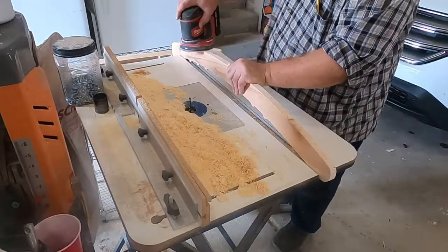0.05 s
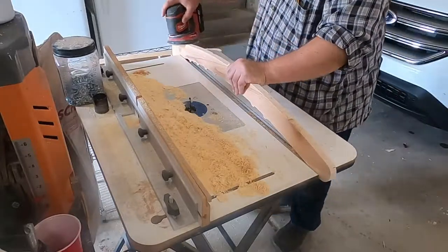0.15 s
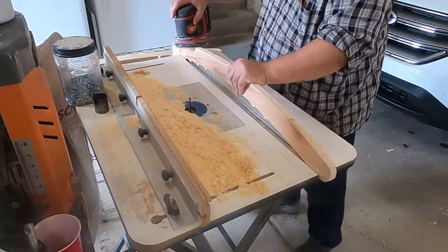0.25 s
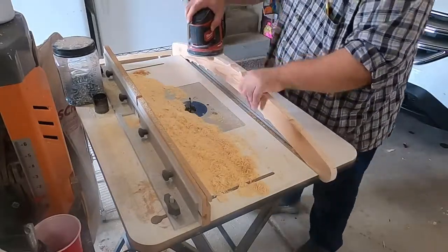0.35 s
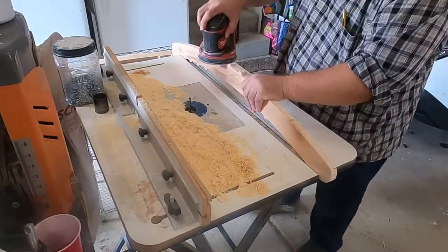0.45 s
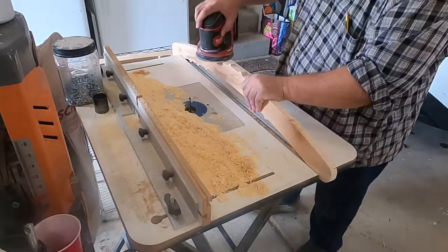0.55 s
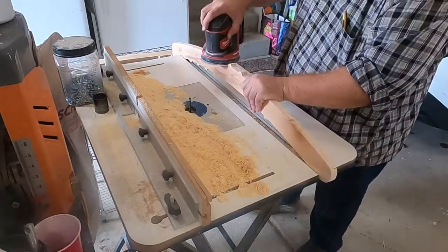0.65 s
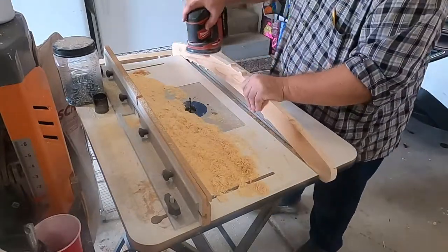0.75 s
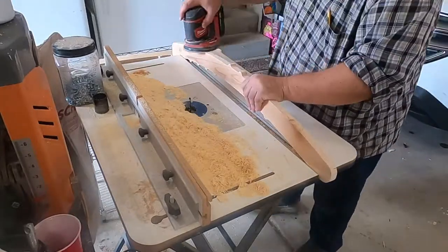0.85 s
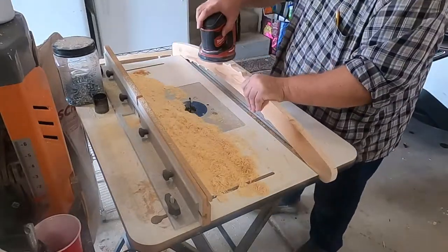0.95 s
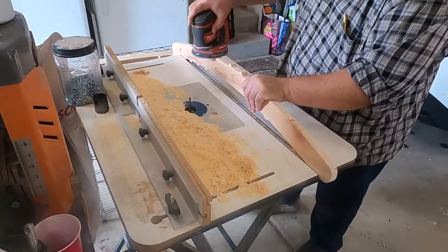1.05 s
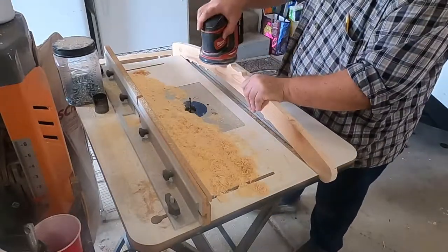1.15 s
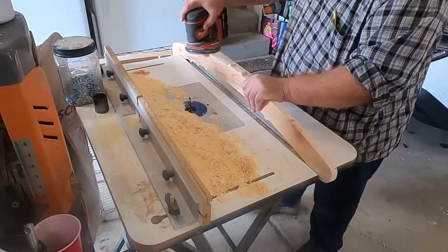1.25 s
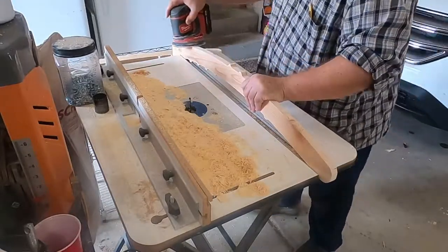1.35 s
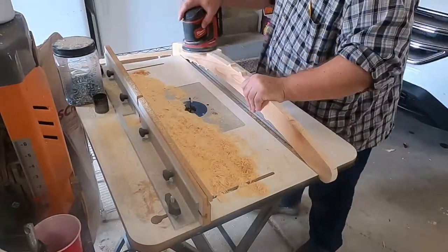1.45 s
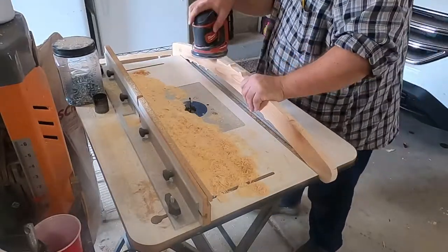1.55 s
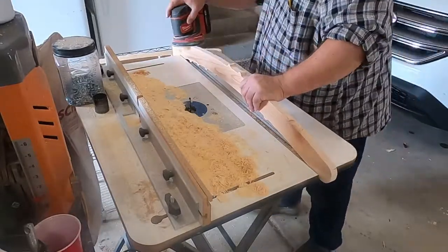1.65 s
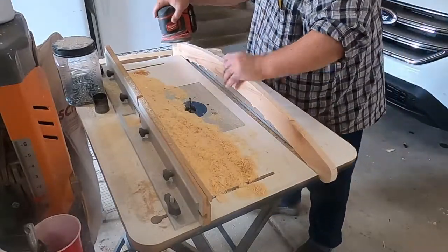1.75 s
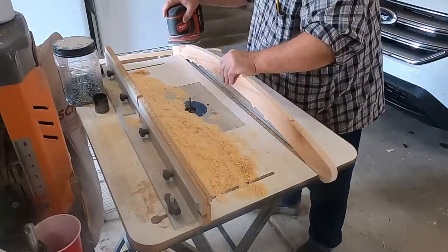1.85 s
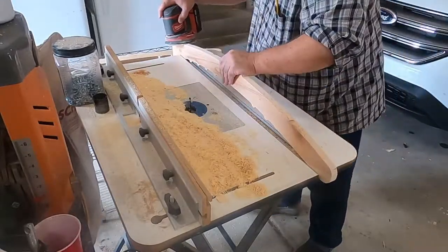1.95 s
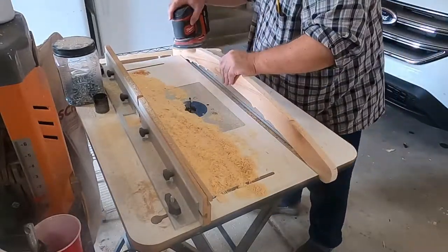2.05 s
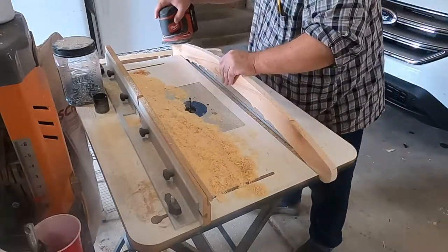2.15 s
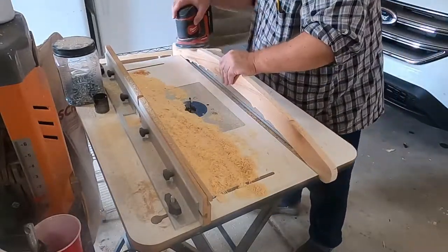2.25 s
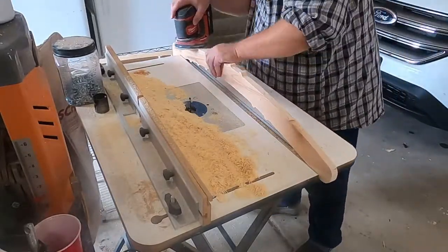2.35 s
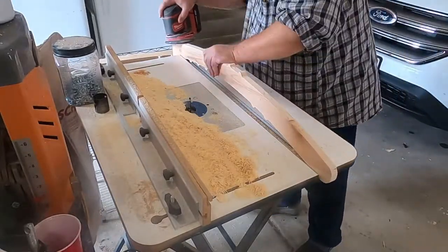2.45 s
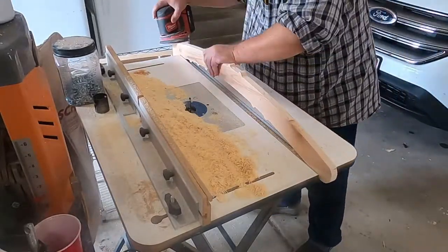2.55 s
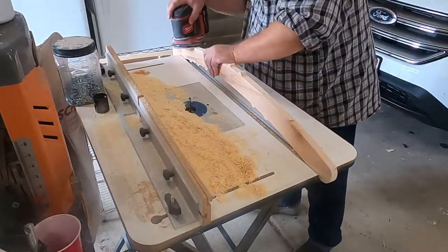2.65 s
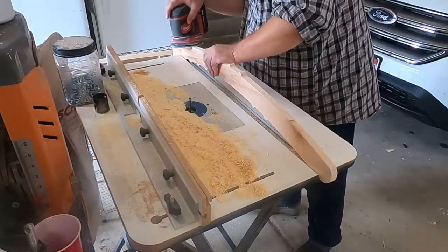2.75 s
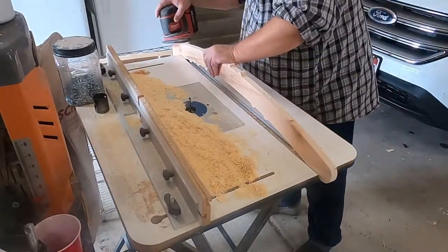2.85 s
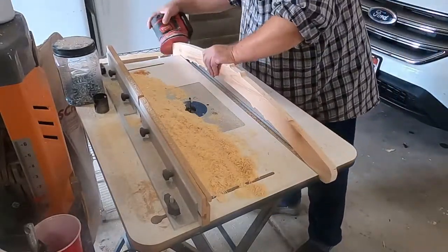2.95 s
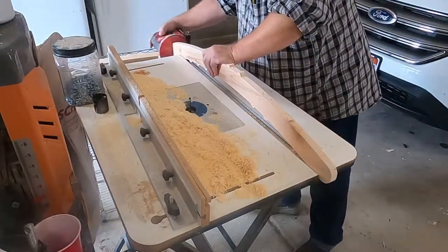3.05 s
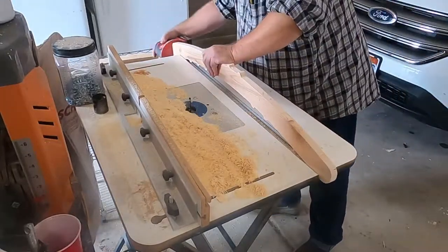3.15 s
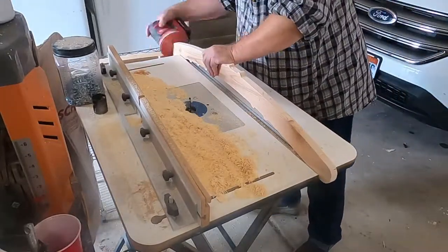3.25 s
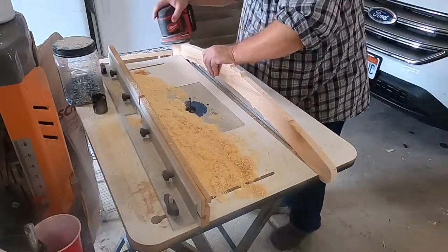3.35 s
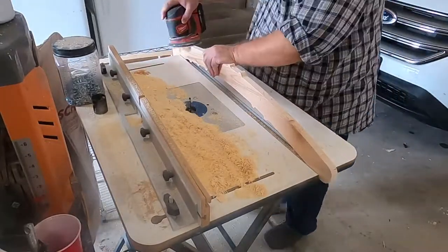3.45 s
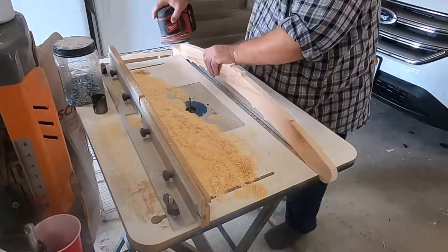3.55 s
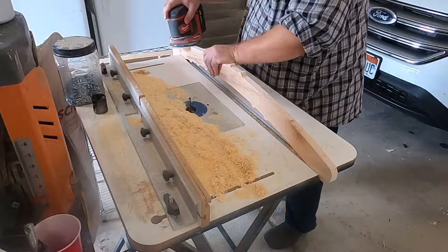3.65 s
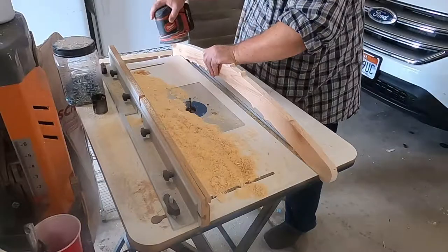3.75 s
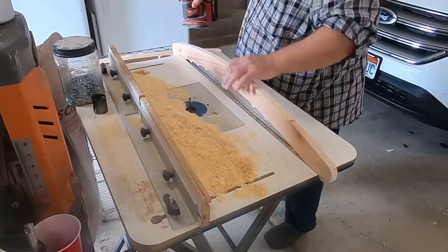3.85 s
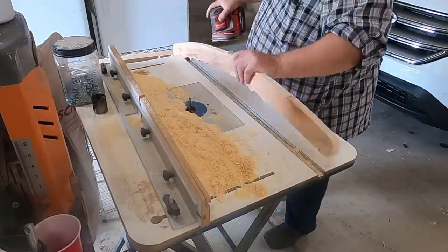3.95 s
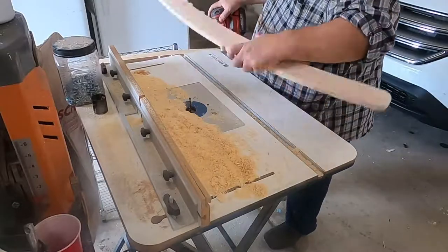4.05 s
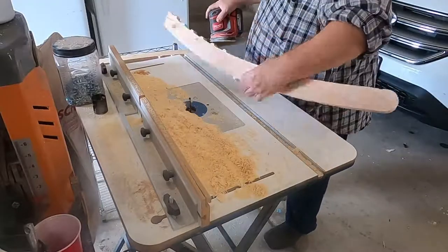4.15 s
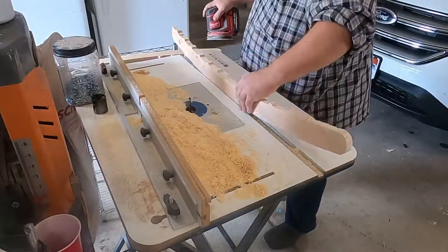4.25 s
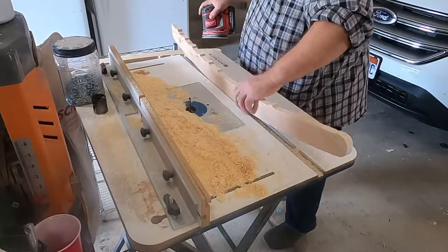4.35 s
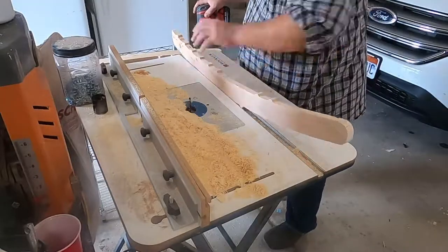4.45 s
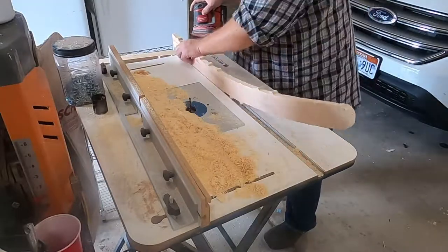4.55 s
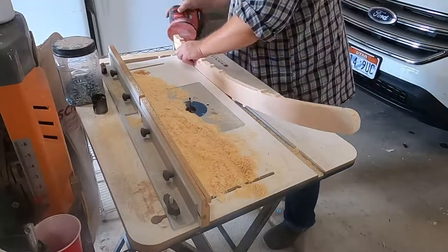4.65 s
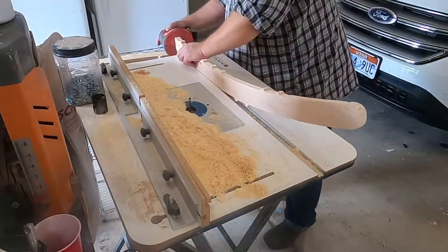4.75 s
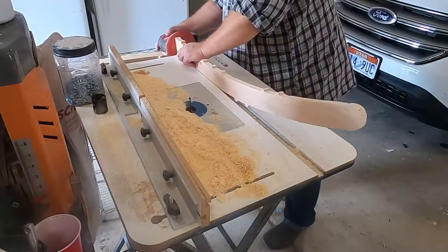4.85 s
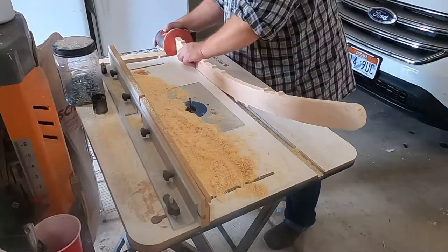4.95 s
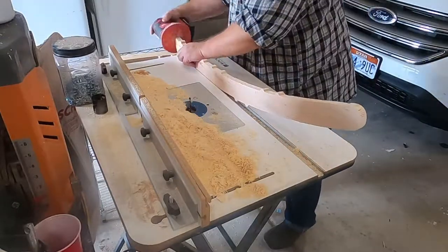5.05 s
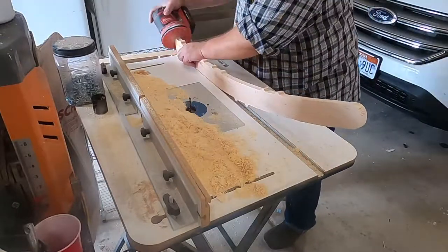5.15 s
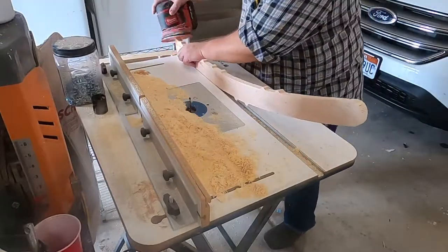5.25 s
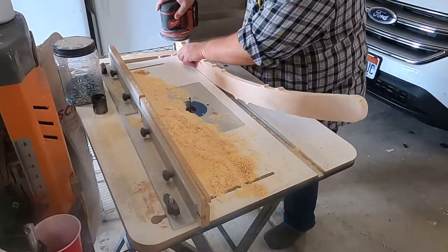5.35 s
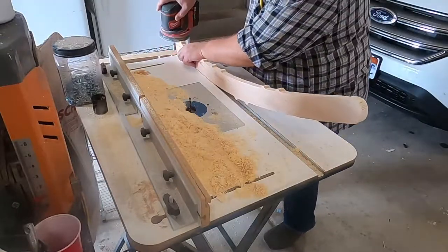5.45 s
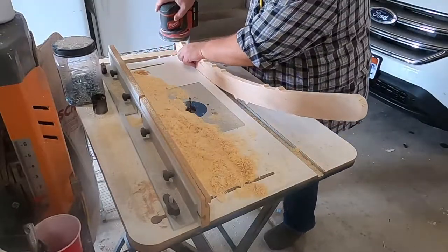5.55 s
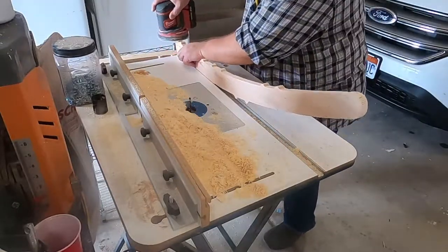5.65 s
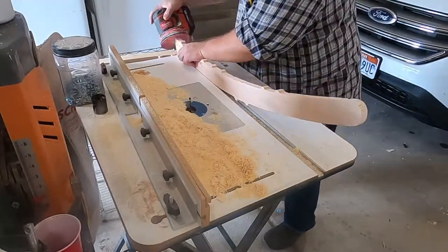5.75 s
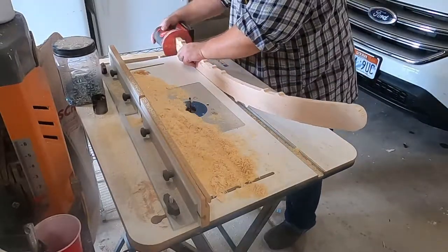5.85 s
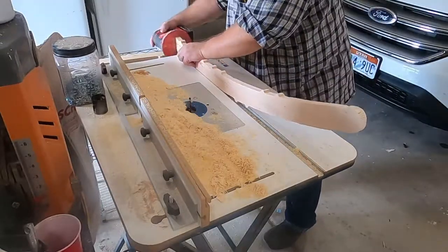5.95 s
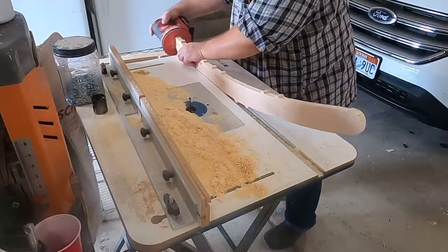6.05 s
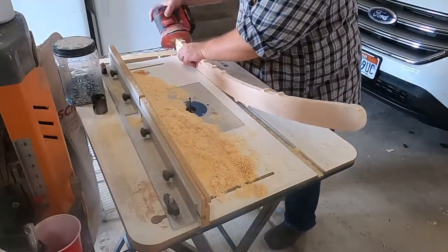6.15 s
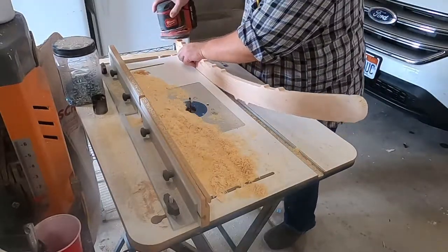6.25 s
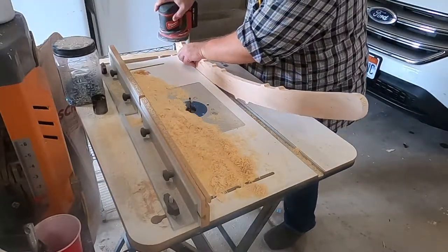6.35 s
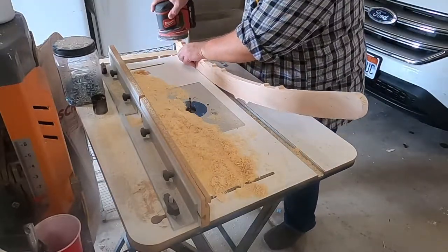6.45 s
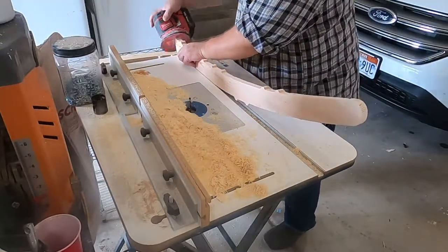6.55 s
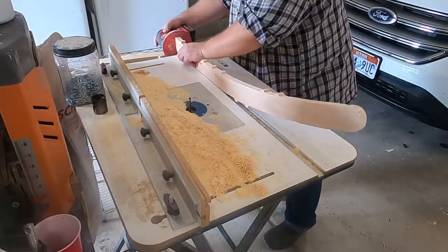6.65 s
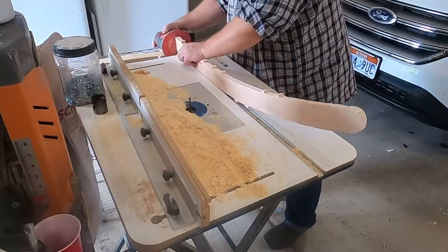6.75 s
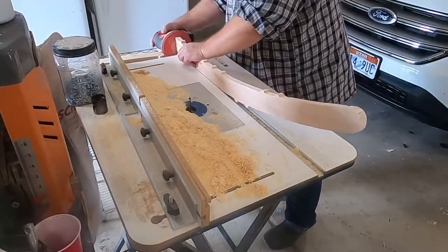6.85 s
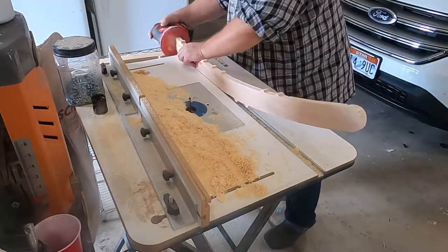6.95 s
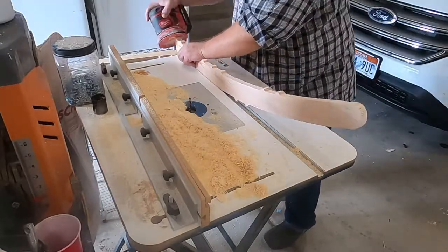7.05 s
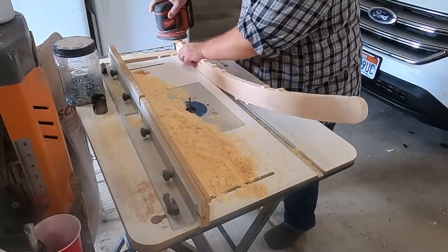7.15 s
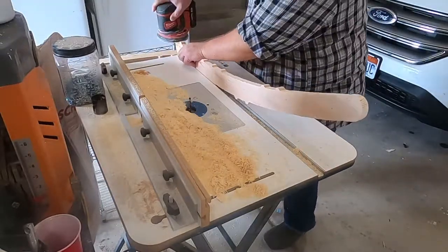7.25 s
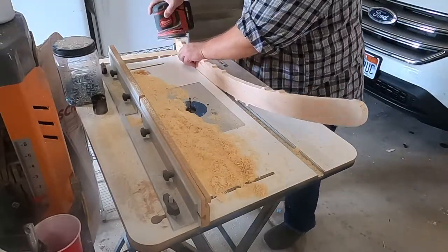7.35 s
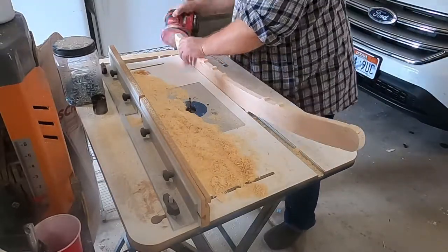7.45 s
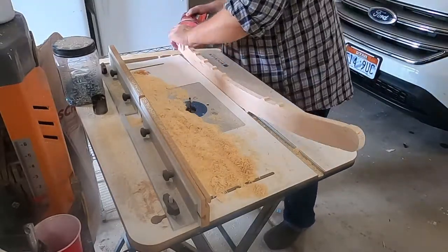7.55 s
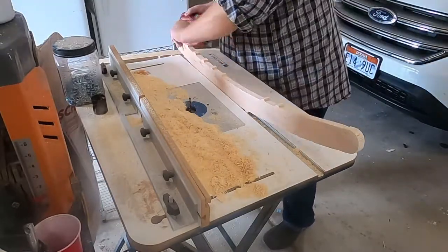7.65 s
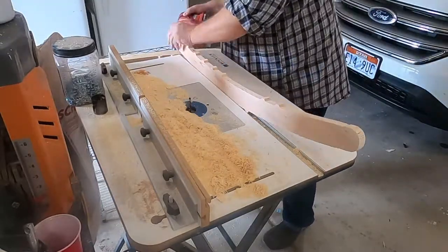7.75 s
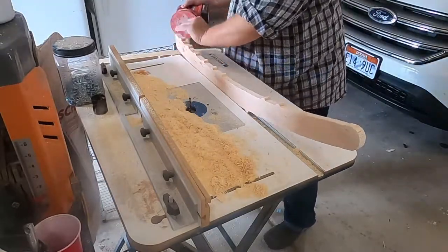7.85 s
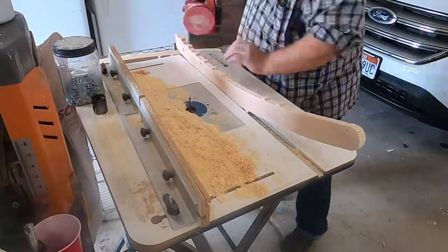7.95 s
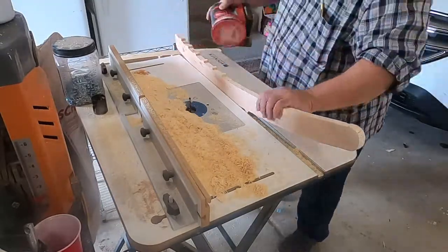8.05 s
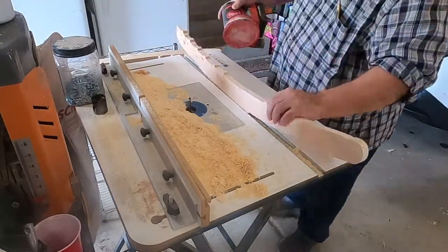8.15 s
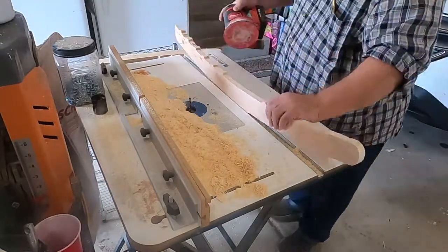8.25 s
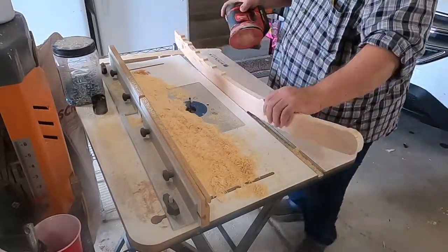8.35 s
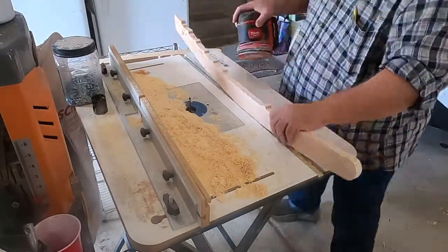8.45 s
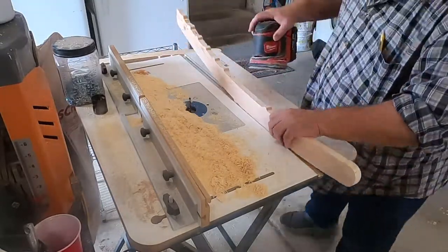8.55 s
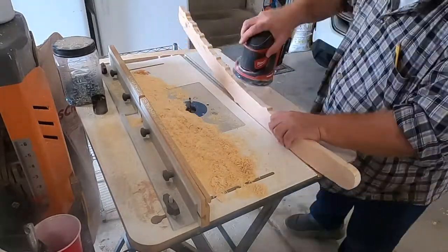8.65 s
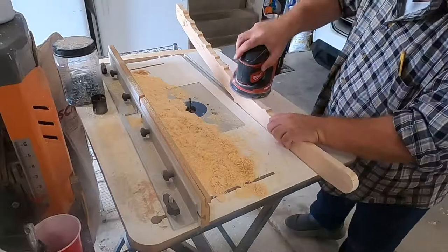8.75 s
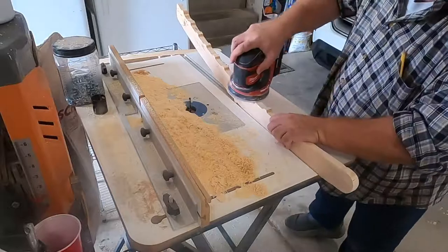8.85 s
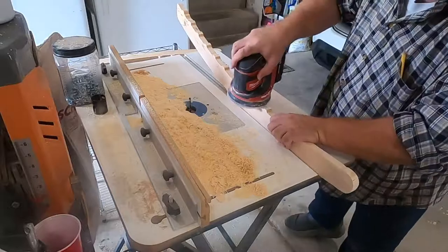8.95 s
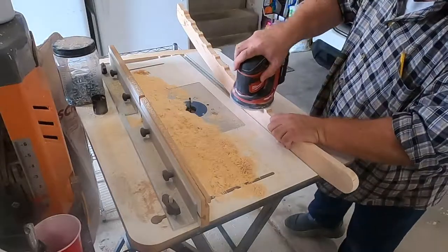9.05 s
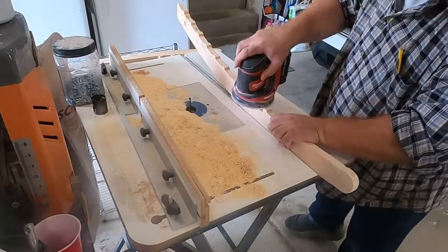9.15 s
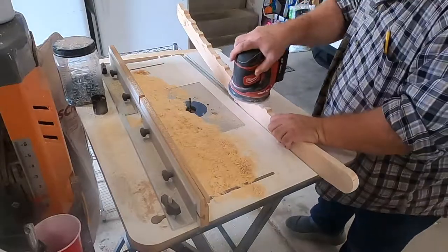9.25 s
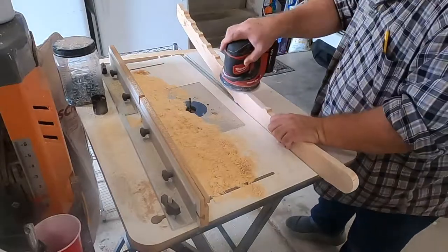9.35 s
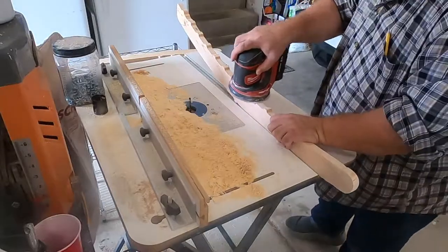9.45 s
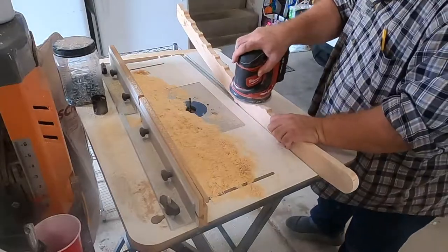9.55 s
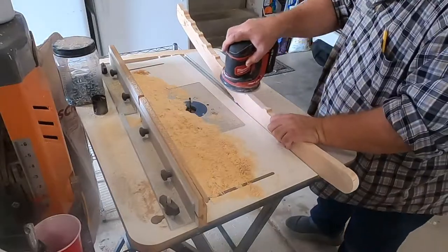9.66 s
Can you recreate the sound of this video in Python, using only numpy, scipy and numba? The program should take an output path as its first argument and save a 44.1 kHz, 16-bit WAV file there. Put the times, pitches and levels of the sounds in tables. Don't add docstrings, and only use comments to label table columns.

```python
import sys
import numpy as np
from scipy import signal
from scipy.io import wavfile
from scipy.ndimage import uniform_filter1d, minimum_filter1d
from numba import njit

SR = 44100
rng = np.random.default_rng(int(sys.argv[2]) if len(sys.argv) > 2 else 0)


def how_loud(loudness_db):
    steps = np.asarray(loudness_db, float) / 20
    return 10 ** steps


def master(y):
    cut = np.clip(np.atleast_2d(y).T, -1, 1)
    pcm = np.round(cut * 32767)
    wavfile.write(sys.argv[1], SR, pcm.astype(np.int16))


N = 427769
HOP = 128
FRAMES = N // HOP + 8

# start_s, end_s
TOUCHES = [
    (-.1, 3.78),
    (4.875, 7.39),
    (8.75, 9.8),
]
# time_s, orbit_hz
SPEED = [
    [(0, 457.3), (.17, 464), (.47, 470.4), (.91, 462.3), (1.01, 455.6), (1.07, 461), (1.5, 464.2),
     (1.72, 471)],
    [(1.73, 469), (1.87, 470.3), (2.07, 460), (2.35, 468), (2.67, 463), (2.83, 465.4), (2.99, 476.6),
     (3.39, 475.2), (3.64, 461.5), (3.775, 460)],
    [(4.87, 499), (5.0, 486.7), (5.27, 473.2), (5.41, 483), (5.77, 473), (5.91, 477.8), (6.51, 472.7),
     (6.8, 483), (7.38, 477)],
    [(8.75, 498), (8.97, 468.4), (9.05, 462.3), (9.23, 461), (9.37, 453), (9.7, 453.7)],
]
# start_s, rasp_db, pad_hum_db, loose_grit_db (against the rasp), board_ring_hz
NEAR_END = [(0, -28, -33, -8.5, 3400), (.09, -28.5, -35, -12.5, 3280), (.3, -27, -35.5, -15, 4220),
            (0.419, -38.5, -33.5, -9, 3730), (.64, -33, -31, -7.5, 1870), (0.739, -26.5, -34, -20.5, 7000),
            (1.13, -34, -31, -9, 6870), (1.228, -25, -34, -23.5, 6800), (1.42, -27.5, -34.5, -12, 5110),
            (1.52, -27, -37, -13.5, 5000), (1.68, -28, -43.5, -14, 5110), (1.759, -28, -42, -12.5, 5470),
            (1.97, -28, -40, -10.5, 4700), (2.28, -27.5, -39, -9, 5100), (2.44, -33.5, -37, -11.5, 1860),
            (2.691, -29.5, -34.5, -11.5, 5600), (2.84, -32, -34.5, -12.5, 1857),
            (2.95, -32.5, -34, -10, 3720), (3.02, -29, -27, -16.5, 3780), (3.12, -33, -26.5, -16, 3790),
            (3.24, -31.5, -26.5, -14, 3750), (3.33, -31, -39.5, -9.5, 5650), (3.5, -28, -34.5, -12, 1830),
            (3.64, -28.5, -42, -15, 5530)]
FAR_END = [(4.88, -32, -32.5, 1, 1950), (4.94, -29, -31.5, -6.5, 5240), (5.04, -26.5, -33.5, -18.5, 4340),
           (5.14, -28, -38.5, -17, 4170), (5.316, -33.5, -45.5, -2, 1877), (5.45, -32, -41, -5, 2410),
           (5.62, -30.5, -43.5, -5, 2830), (5.75, -30.5, -36.5, -7, 1900), (5.89, -27, -36.5, -14, 1451),
           (6.256, -34.5, -47, -2, 962), (6.53, -29.5, -35, -5, 6100), (6.6, -31, -34.5, -9, 6170),
           (6.7, -33, -33, -4, 5000), (6.92, -30, -31, -7.5, 5510), (7.07, -27.5, -39, -11, 4300),
           (7.172, -31.5, -47.5, -6.5, 4105)]
FACE = [
    (8.75, -43, -37.5, 14, 1487),
    (8.82, -34, -37.5, -7.5, 1170),
    (8.94, -31.5, -31, -10, 3710),
    (9.03, -30, -32, -9, 3700),
    (9.23, -30.5, -29.5, -8, 7800),
    (9.385, -35.5, -30.5, -6, 3650),
    (9.45, -28.5, -24.5, -14.5, 3860),
    (9.53, -32, -30, -5.5, 2255),
]
STROKES = NEAR_END + FAR_END + FACE
# start_s, boom_db, sizzle_db, low_grit_db
HOLDS = [(0, -5.5, -2.5, -3), (.42, -4, -3.5, 3), (.74, -7, -4.5, 4.5), (1.4, -2, 1, -7),
         (1.97, -4, 0.5, -9), (2.42, -0.5, 0, 3), (3.02, 3.5, -3.5, 2), (3.33, 0, -0.5, 0),
         (4.88, 2, -1, 0), (5.32, 2, 0, 1.5), (5.44, 0.5, -1, -5), (5.66, -1.5, -2.5, 2),
         (5.75, -2, -1.5, -1.5), (5.89, 2, -1.5, -3.5), (6.27, -0.5, -2.5, 1.5), (6.55, 0.5, -1.5, -4.5),
         (7.0, 0, 0, -7), (7.2, -0.5, 0, -3.5), (8.75, 4, 8, 3)]
# time_s, level_db
SLIPS = [(.18, -2.5), (.53, -1), (1.05, -6), (1.46, -4.5), (2.181, -5.5), (2.58, -1.5), (3.335, -6.5),
         (3.59, -5.5), (4.9, -9), (6.315, -3.5), (6.87, -1.5), (7.19, -5), (9.2, -3.5)]
# time_s, level_db
DIGS = [
    (.35, 1.5),
    (1.93, 1),
    (2.33, 1.5),
    (5.31, 1.5),
    (6.25, 1.5),
    (7.165, 2),
]
# time_s, level_db
BURSTS = [(.285, 7), (1.2, 3), (1.47, 2), (1.57, -5), (1.64, 4), (1.74, -6), (1.855, 8), (1.93, -4),
          (2.0, 4), (2.07, 1.5), (2.245, 3), (2.3, -2), (2.37, -2), (2.41, 3.5), (3.61, 5.5), (5.335, 3),
          (5.71, 2.5), (6.275, 2), (7.18, 5), (9.12, -4), (9.21, 6), (9.34, -6), (9.535, 3), (9.6, -5)]
# time_s, hum_db
HUM_GAPS = [
    (1.79, -9),
    (3.41, -22),
    (2.14, -7),
    (6.36, -12),
    (6.48, -3.5),
    (7.23, -18),
    (7.31, -17),
]
# time_s, hum_db
HUM_SWELLS = [
    (.7, 3),
    (1.98, 2.5),
    (1.69, 10),
    (2.8, 3),
    (5.19, 10),
    (6.08, 6),
    (9.07, 3),
    (9.29, 2),
]
# start_s, end_s, depth_db
ROCKING = [
    (2.936, 3.32, -11),
]
# start_s, end_s, orbit_multiple,
# level_db
GRIPS = [(0, 0.197, 2, 7.5), (0, 0.2, 4, 6), (0, 0.197, 9, -6), (0, 0.2, 15, 6.0), (0, 0.42, 3, -6),
         (0.581, 0.742, 15, 8), (0.422, 0.717, 9, -5.5), (0.75, 0.923, 3, -5), (0.737, 0.918, 4, 4),
         (0.74, 0.917, 6, 4), (0.74, 0.92, 10, -5.0), (0.74, 0.922, 14, 6), (0.74, 0.92, 18, 7),
         (0.74, 0.92, 22, -9), (0.742, 1.13, 19, 4.5), (0.922, 1.13, 2, 8), (0.914, 1.13, 3, -7),
         (0.92, 1.13, 8, -3), (0.92, 1.13, 12, -5), (0.92, 1.13, 10, -11), (0.916, 1.13, 15, 7.5),
         (1.223, 1.416, 2, 6), (1.225, 1.427, 3, -10), (1.228, 1.42, 17, -6), (1.42, 1.58, 14, 7),
         (1.228, 1.42, 16, -8), (1.228, 1.423, 22, -11), (1.228, 1.583, 19, 3), (1.418, 1.579, 15, 9),
         (1.42, 1.58, 9, 6.5), (1.58, 1.76, 9, 4), (1.58, 1.762, 7, -4.0), (1.58, 1.76, 15, 6),
         (1.758, 1.971, 25, 8), (1.97, 2.159, 2, 3.5), (1.97, 2.16, 5, -4), (1.972, 2.161, 11, 5),
         (1.968, 2.163, 12, 3), (1.97, 2.16, 17, 5.0), (1.97, 2.42, 10, -4), (2.2, 2.418, 13, 6),
         (0.42, 0.74, 18, -6), (0.58, 0.74, 11, -6), (2.44, 2.687, 4, -5), (2.44, 2.69, 7, 4.5),
         (2.44, 2.69, 8, 4), (2.44, 2.69, 14, -10), (2.691, 2.97, 17, 5),
         (2.8, 3.33, 2, 1.5), (3.006, 3.33, 4, -9.5), (2.8, 3.33, 5, 2.5), (3.0, 3.33, 7, -4.5),
                (3.2, 3.33, 9, 3), (3.12, 3.33, 6, -5), (3.35, 3.6, 4, -2), (4.92, 5.06, 4, 6),
                (3.35, 3.6, 17, 4.5), (3.35, 3.6, 19, 2), (3.621, 3.79, 3, 3.5), (3.62, 3.79, 4, -9.5),
                (3.62, 3.79, 8, 2.5), (3.621, 3.79, 10, 4), (3.62, 3.79, 11, -5), (3.62, 3.79, 12, 2.5),
                (3.62, 3.5, 14, -4), (3.62, 3.79, 23, 4.5), (4.92, 5.065, 6, -8), (4.92, 5.063, 12, 8.5),
                (4.92, 5.2, 13, 3), (5.06, 5.2, 10, -12), (5.061, 5.2, 16, -8.5), (5.06, 5.2, 25, 8),
                (5.212, 5.324, 4, -15), (5.197, 5.32, 5, 5.5), (5.44, 5.616, 5, -3), (5.436, 5.62, 8, 4.0),
                (5.32, 5.62, 14, -13), (5.44, 5.89, 20, 5), (5.44, 6.255, 18, 6), (5.2, 5.32, 18, 6.5),
                (5.62, 5.75, 10, -7), (5.62, 5.75, 4, 2), (5.62, 6.05, 19, 2), (5.89, 6.05, 6, 4),
                (6.05, 6.255, 11, 4), (6.048, 6.255, 4, -4),
         (6.4, 6.699, 18, 7), (6.7, 6.921, 8, -9), (6.4, 6.547, 13, 6), (6.4, 6.55, 6, 4),
              (6.92, 7.19, 14, -4.5), (7.07, 7.186, 7, 7.5), (7.19, 7.39, 2, 9), (7.19, 7.391, 10, -7),
              (7.191, 7.39, 18, 8), (8.995, 9.2, 3, 5), (9.004, 9.199, 6, -4), (8.996, 9.198, 17, 5.5),
              (9.231, 9.399, 7, -5), (9.243, 9.399, 8, 4.5), (9.4, 9.7, 15, -5), (9.23, 9.4, 23, -7.5),
              (9.44, 9.7, 7, -8.0), (9.55, 9.7, 2, -8), (9.549, 9.7, 23, -7.0)]
# orbit_multiple, level_db
ON_EDGE = [(2, -14), (3, -4.5), (4, -1.5), (5, -3.5), (7, -2), (8, 0.5), (12, 0), (20, -4), (35, -14)]
# orbit_multiple, level_db
ON_FACE = [(2, -12), (3, -7), (4, -9.5), (6, -3), (8, 0), (14, -9), (17, -7.5), (35, -27)]
# frequency_hz, density_db
SCRATCH = [(400, -35), (700, -27.5), (1100, -17.5), (1650, -17.5), (2100, -11.5), (2650, -13), (3300, -7.5),
           (4200, -2.5), (6500, -2.5), (9400, -1), (10200, -13), (12000, -5), (16000, -14.5)]
# time_s, level_db, brightness_db, ring_t60_s
KNOCKS = [(3.96, -40, -29, 0.059), (4.2312, -17.5, -1, 0.05), (4.2366, -17.5, 2, 0.07),
          (4.244, -26, 0, 0.13), (4.2735, -25, -34, 0.054), (4.298, -46, -20, 0.058),
          (4.443, -38, -26, 0.033), (4.469, -29, 4, 0.044), (4.558, -33, -15, 0.048),
          (4.8799, -19.5, 8.5, 0.054), (7.463, -38, -17, 0.059), (8.548, -35, -9, 0.06)]
# frequency_hz, width_hz, level_db
BOARD = [(510, 110, 9.5), (1060, 140, 9), (1410, 230, 4), (2264, 230, 5), (4300, 2400, 10), (5914, 940, -9),
         (8920, 3430, -12)]
# time_s, peak_db, pitch_hz
BUMPS = [
    (7.463, -37, 380),
    (7.642, -33, 318),
    (7.95, -33, 331.4),
    (7.991, -33, 335),
    (8.205, -33, 320.6),
    (8.236, -28, 318),
    (8.325, -38, 410),
    (8.46, -39, 400),
    (8.549, -36, 405),
]
# time_s, peak_db, pitch_hz
JOLTS = [
    (2.4, -9.5, 470),
    (2.432, -13.5, 472),
]
# time_s, fan_db, pad_hum_db
FAN = [(0, -44.5, -21), (3.76, -43.5, -49), (3.83, -42.5, -48), (4.1, -38.5, -44.5), (4.3, -40.5, -46),
       (4.6, -40, -43.5), (4.85, -37.5, -37), (5.0, -44, -36), (7.38, -43, -40), (7.46, -39, -42.5),
       (7.7, -39, -40.5), (8, -36.5, -40), (8.55, -36, -37), (8.72, -36.5, -40.5), (9.7, -43.5, -38)]
# orbit_multiple, level_db (against the fan)
WHINE = [(2, -24), (3, -24.5), (4, -24), (7, -17.5), (7.68, -17.5), (8, -26), (8.125, -20.5), (9, -12.5),
         (9.125, -19), (12.83, -19), (13.55, -25), (18, -31), (30.73, -21)]
# frequency_hz, density_db
AIR = [(30, -22), (130, -25.5), (240, -8.5), (420, -9.5), (650, -8.5), (1000, -8), (1500, -2), (2500, -3.5),
       (3600, 3), (4500, -1), (5200, -0.5), (9000, -3), (16000, -7.5)]
# time_s, level_db, centre_hz
GUSTS = [
    (8.02, 7, 3600),
    (8.18, 1, 7600),
    (8.53, 5, 2400),
    (8.6, 0, 8100),
    (4.75, 6, 4900),
]
# frequency_hz, level_db
SHOP = [
    (236, -66),
    (823.5, -58),
    (1276, -75),
    (1776, -79),
]
# time_s, level_db
PUFF = [
    (3.56, -67),
    (3.588, -42),
    (3.802, -84),
    (3.84, -79),
]
# frequency_hz, density_db
PUFF_COLOUR = [(12, -44), (20, -14), (49, -1), (130, -2), (225, -3), (399, -10), (420, -10), (550, -35),
               (920, -120)]
# frequency_hz, side_against_mid_db
SIDE_DB = [(300, -27), (1500, -13), (5000, -13), (9000, -7.5), (14000, -5.5)]
# frequency_hz, left_minus_right_db
LEAN = [(60, 2.5), (400, 2.3), (1400, .8), (3000, .2), (6000, .5), (10000, 1.5)]

PORTS = -0.64
UNLIKE = np.sqrt(1 - PORTS ** 2)
CHANGE_S, SNAP_S, HUM_CHANGE_S = 0.026, 0.024, 0.024
SLIP_S, BURST_S, GAP_S, SWELL_S, HOOK_S = 0.025, 0.027, 0.013, 0.054, 0.013
LAND_S, LIFT_S, SPIN_UP_S = 0.027, 0.047, 0.09


def rasp(turns):
    t = np.arange(N) / SR
    level, _, _, grit = touch(t)

    def scratch_db(hz, t):
        flap = 11 * np.exp(-((hz - 1030) / 100) ** 2)
        flap_db = flap * (.25 + .75 * (t > 5.3) * (t < 7.5))
        low_db = steps(HOLDS, t, CHANGE_S)[2] / (1 + (hz / 3300) ** 6)
        return read(SCRATCH, hz) + tilt(hz, t) + flap_db + low_db

    scratch = noise(scratch_db, size=512)
    clumps_db = sum(db * drift(1, rate_hz)[0].real for db, rate_hz in [(2.64, 110), (2.46, 40), (1.8, 4.4)])
    once_an_orbit = 1 + 0.17 * np.cos(2 * np.pi * turns)
    scratch *= evened(once_an_orbit * how_loud(unframe(clumps_db)))
    blows = strikes(turns)
    rocking = sum(how_loud(db) * (t > s) * (t < end) for s, end, db in ROCKING)
    rocking = rocking * unframe(1 + 0.77 * drift(1, 27)[0])
    upper = signal.sosfilt(signal.butter(4, 1300, "high", fs=SR, output="sos"), blows)
    blows = blows + upper * (uniform_filter1d(rocking.real, size=900) * np.cos(np.pi * turns))
    return blows + how_loud(3.5) * level * grit * scratch


def strikes(turns):
    t, k = np.arange(FRAMES) * HOP / SR, np.arange(1, 36)[:, None]
    count = len(k)
    level, _, _, grit = touch(t)
    hz = k * speed(t)
    size = how_loud(colour(k, hz, t) + tilt(hz, t)) * (k > 1)
    size *= level * np.sqrt((1 - 0.63 * grit ** 2) * 2 / (size ** 2).sum(0))
    size *= how_loud(0.49 * np.sqrt(2) * drift(1, 37.0).real)
    patches = evened(uniform_filter1d(drift(count, 8.0).real, size=5, axis=0))
    size *= how_loud(np.clip(k / 12, 0, 1) * 1.39 * patches)
    size[1] *= 1 + 1.1 * grit
    size[0] = np.sqrt(2) * how_loud(hum(t))

    fade = 0.36
    fading = 1 + fade * drift(count, 4.64) + .3 * drift(count, 15.5)
    steady = np.where(k > 1, fading / np.sqrt(1 + fade ** 2), 1)
    loose = np.clip(1.96 * grit * (level > 0), 0, .99)
    loose = loose * np.clip(0.32 + k / 14, 0, .85)
    loose[1] = np.clip(1.28 * grit, 0, .99)
    loose[0] = np.clip(0.017 + how_loud(-12.5) * grit * level / size[0], 0, .95)
    wander = np.sqrt(1 - loose ** 2) * steady + loose * drift(count, 55.8)

    scatter = 1.7 * rng.standard_normal(k.shape)
    slip = (0.19 * (0.29 + grit)) * (k - .7) * drift(1, 30.2).real
    delay = np.exp(1j * (scatter + slip))
    delay *= np.exp(.25j * k * drift(1, 9.2).real * (level > 0))
    side = np.where(k > 1, 1j * PORTS * wander + UNLIKE * drift(count, 6.0), .5 * wander)
    parts = pair(wander, side, hz) * size * delay
    return stack(np.ascontiguousarray(parts.transpose(0, 2, 1)), np.exp(2j * np.pi * turns), HOP)


def touch(t):
    at = np.arange(FRAMES) * HOP / SR
    rasp_db = steps(STROKES, at, CHANGE_S)[0]
    grit_db = steps(STROKES, at, SNAP_S)[2]
    skip_db = bumps(SLIPS + DIGS, at, SLIP_S)
    boom_db, sizzle_db, _ = steps(HOLDS, at, CHANGE_S)
    boom_db = boom_db - 0.4 * (rasp_db + skip_db + 24)
    grit_db = grit_db + bumps(BURSTS, at, BURST_S) - 0.45 * skip_db - 0.95 * bumps(DIGS, at, SWELL_S)
    level = contact(at) * how_loud(rasp_db + skip_db)
    parts = level, boom_db, sizzle_db, np.clip(how_loud(grit_db), 0, .99)
    return [np.interp(t, at, p) for p in parts]


def contact(t):
    return sum(np.clip(np.minimum((t - s) / LAND_S, (end - t) / LIFT_S + .5), 0, 1) ** 2 for s, end in TOUCHES)


def speed(t):
    hz = follow(sum(SPEED, []), t)[0]
    for before, after in zip(SPEED, SPEED[1:]):
        (lift, loaded), (land, free) = before[-1], after[0]
        run_up = free - (free - loaded) * np.exp(-abs(t - lift) / SPIN_UP_S)
        hz = np.where((t > lift) & (t < land), run_up, hz)
    return hz - 7 * bumps(DIGS[3:], t, HOOK_S)


def tilt(hz, t):
    _, boom_db, sizzle_db, _ = touch(t)
    notch_db = -4.5 * np.exp(-((hz - 7730) / 120) ** 2) * (t < FACE[0][0])
    return notch_db + boom_db / (1 + (hz / 2800) ** 6) + sizzle_db / (1 + (7000 / (hz + 1)) ** 8)


def colour(k, hz, t):
    rows = np.array(STROKES)
    ring_hz = rows[np.maximum(np.searchsorted(rows[:, 0], t, "right") - 1, 0), -1]
    grips = GRIPS
    grip_db = sum(db * (k == round(order)) * (t >= s) * (t < end) for s, end, order, db in grips)
    ring_db = 4.5 * np.exp(-((hz - ring_hz) / 330) ** 2)
    blow_db = np.where(t < FACE[0][0], read(ON_EDGE, k), read(ON_FACE, k))
    return blow_db + uniform_filter1d(grip_db + ring_db, size=9, axis=1)


def hum(t):
    on = contact(t)
    pressed_db = steps(STROKES, t, HUM_CHANGE_S)[1]
    pressed_db = pressed_db + bumps(HUM_GAPS, t, GAP_S) + bumps(HUM_SWELLS, t, SWELL_S)
    return on * pressed_db + (1 - on) * follow(FAN, t)[1]


def board():
    out, t = np.zeros(N), np.arange(6000) / SR
    for s, db, bright_db, t60 in KNOCKS:
        cracks, ring = rng.standard_normal(len(t)), 0
        for hz, width, mode_db in BOARD:
            band = signal.lfilter(*signal.iirpeak(hz, hz / width, SR), cracks)
            decay_db = 60 * t / t60 * (hz / 460) ** 0.37
            ring = ring + evened(band) * how_loud(mode_db + bright_db * np.log2(hz / 460) / 2 - decay_db)
        out[round(s * SR):][:len(t)] += how_loud(db) * 1.07 * ring / abs(ring).max()
    for s, db, hz in BUMPS:
        peak = signal.iirpeak(hz, 2.5, SR)
        thud = evened(signal.lfilter(*peak, signal.lfilter(*peak, rng.standard_normal(len(t)))))
        out[round(s * SR):][:len(t)] += how_loud(db - 9.5 - 60 * t / 0.1) * thud * np.minimum(t / 0.01, 1)
    for s, db, hz in JOLTS:
        ring = how_loud(db - 60 * t / 0.089) * np.sin(2 * np.pi * hz * t)
        out[round(s * SR):][:len(t)] += ring * np.minimum(t / 0.017, 1) * 0.54
    out = signal.sosfilt(signal.butter(3, 260, "high", fs=SR, output="sos"), out)
    return out * how_loud([[.8], [-.8]])


def motor(turns):
    t = np.arange(N) / SR
    fan, tones = how_loud(follow(FAN, t)[0]), np.zeros((2, N))
    for (order, db), waver in zip(WHINE, drift(len(WHINE), 9.9)):
        line = how_loud(db) * unframe(1 + .28 * waver) * np.exp(2j * np.pi * order * turns)
        tones += pair(line.real, line.imag, order * 490)
    for hz, db in SHOP:
        tones += how_loud(db + 37.5) * np.cos(2 * np.pi * (hz * t + rng.random()))
    patches = uniform_filter1d(rng.standard_normal((N // 256 + 5, 513)), size=45, axis=0)
    patches_db = 1.4 * evened(uniform_filter1d(patches, size=24, axis=1)).T

    def air_db(hz, t):
        gusts_db = sum(db * np.exp(-((t - s) / 0.086) ** 2 - ((hz - at_hz) / 950) ** 2) for s, db, at_hz in GUSTS)
        return read(AIR, hz) + gusts_db + patches_db

    return fan * (np.sqrt(2) * tones + how_loud(-3.5) * noise(air_db, size=1024))


def wind():
    t = np.arange(N) / SR
    gust = how_loud(follow(PUFF, t)[0]) * (t > PUFF[0][0]) * (t < PUFF[-1][0])
    return gust * noise(lambda hz, t: read(PUFF_COLOUR, hz), size=2048)


def noise(colour_db, size):
    count, hz = N * 4 // size + 5, np.fft.rfftfreq(size, 1 / SR)[:, None]
    a, b, c, d = rng.standard_normal((count, len(hz), 4)).T
    gain = how_loud(colour_db(hz, np.arange(count) * size / 4 / SR)) * np.ones(count)
    gain = gain / np.sqrt((gain ** 2).mean(0))
    mid = a + 1j * b
    spectrum = pair(mid, 1j * PORTS * mid + UNLIKE * (c + 1j * d), hz) * gain
    return evened(signal.istft(spectrum, nperseg=size, noverlap=size * 3 // 4)[1][:, :N])


@njit
def stack(parts, turn, hop):
    out = np.zeros((2, len(turn)))
    for i in range(len(turn)):
        frame, share, wheel = i // hop, (i % hop) / hop, 1 + 0j
        for k in range(parts.shape[2]):
            wheel *= turn[i]
            for c in range(2):
                height = (1 - share) * parts[c, frame, k] + share * parts[c, frame + 1, k]
                out[c, i] += (height * wheel).real
    return out


def pair(mid, side, hz):
    side, lean = how_loud(read(SIDE_DB, hz)) * side, how_loud(read(LEAN, hz) / 2)
    return np.array([(mid + side) * lean, (mid - side) / lean])


def drift(count, rate_hz):
    z = rng.standard_normal((FRAMES, count)) + 1j * rng.standard_normal((FRAMES, count))
    low = signal.butter(3, min(rate_hz * 2 * HOP / SR, .9), output="sos")
    return evened(signal.sosfilt(low, z, axis=0)).T


def unframe(x):
    return np.interp(np.arange(N) / HOP, np.arange(FRAMES), x)


def steps(rows, t, change_s):
    rows = np.array(rows)
    over = .5 + .5 * np.tanh((t[:, None] - rows[1:, 0]) / change_s)
    return (rows[0, 1:] + over @ np.diff(rows[:, 1:], axis=0)).T


def bumps(rows, t, width_s):
    return sum(db * np.exp(-((t - s) / width_s) ** 2) for s, db in rows)


def follow(rows, t):
    s, *columns = np.transpose(rows)
    return [np.interp(t, s, c) for c in columns]


def read(points, hz):
    f, value = np.transpose(points)
    return np.interp(np.log(hz + 1), np.log(f + 1), value)


def evened(x):
    return x / np.sqrt(np.mean(abs(x) ** 2) + 1e-20)


def starve(x, under_db, by_db):
    edges = np.r_[0:40:4, 40:160:6, 160:1025:10]
    z = signal.stft(x, nperseg=2048, noverlap=1536)[2]
    top_db = 10 * np.log10(np.maximum.reduceat(abs(z).mean(0) ** 2, edges, axis=0) + 1e-20)
    near_db = -minimum_filter1d(-top_db, size=9, axis=0)
    extra_db = 15 * (edges < 40) + 6 * (edges < 62) - 2 * (edges < 156)
    masked = near_db - top_db > under_db + extra_db[:, None]
    masked[:7] = False
    gain = np.repeat(how_loud(-by_db * masked), np.diff(np.r_[edges, 1025]), axis=0)
    return signal.istft(z * gain, nperseg=2048, noverlap=1536)[1][:, :N]


def scene():
    turns = np.cumsum(speed(np.arange(N) / SR)) / SR
    return rasp(turns) + board() + motor(turns) + wind()


def top_cut(x):
    return signal.sosfilt(signal.butter(12, 16590, fs=SR, output="sos"), x)


def record(dry):
    edge = signal.firwin(767, 15760, window=("kaiser", 9), fs=SR)
    lean = starve(dry, under_db=27.0, by_db=22)
    mix = signal.oaconvolve(lean, edge[None], "same")
    return top_cut(mix)


dry = scene()
out = record(dry)
master(out)
```